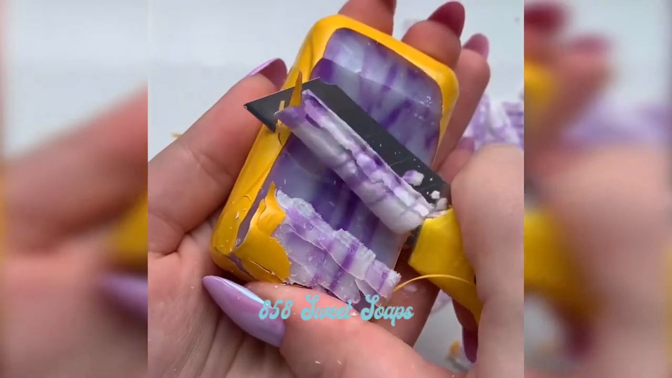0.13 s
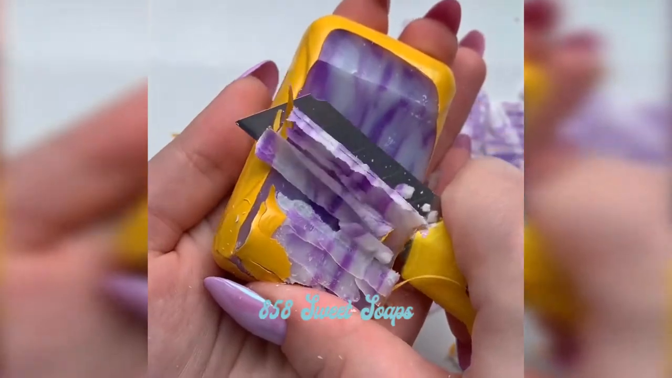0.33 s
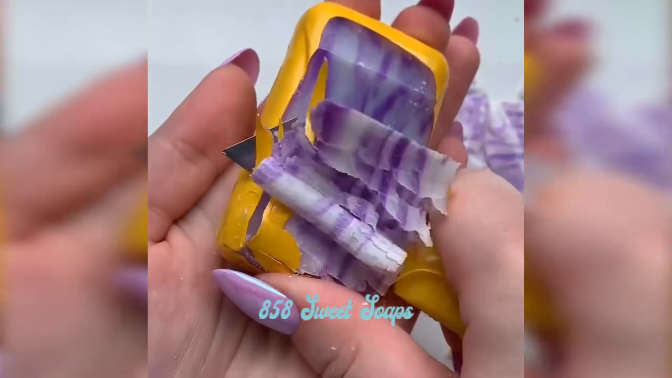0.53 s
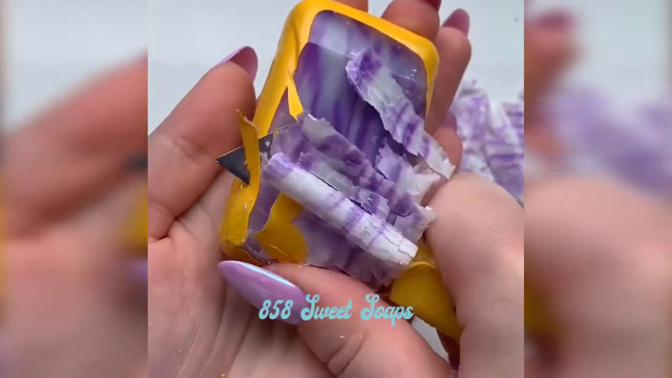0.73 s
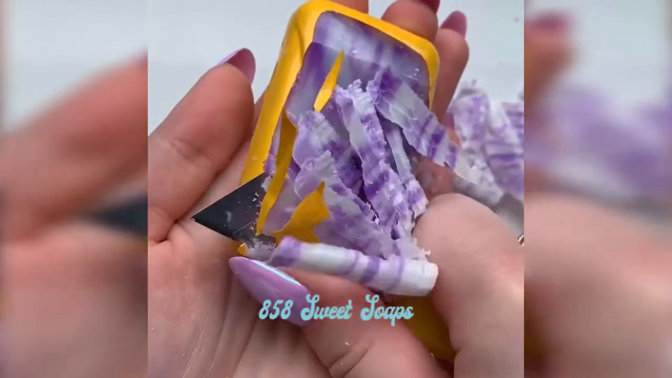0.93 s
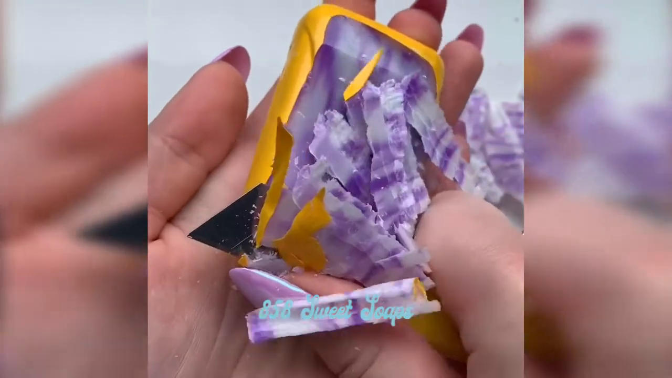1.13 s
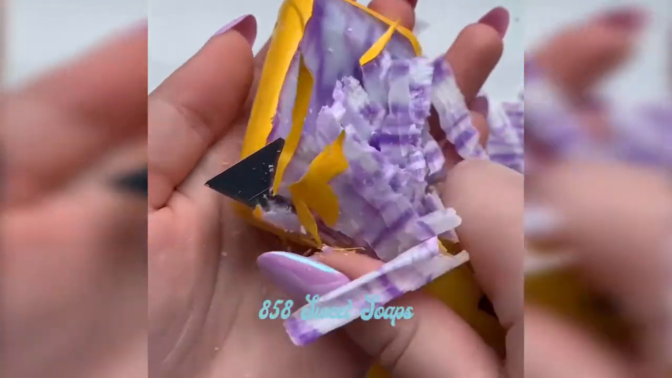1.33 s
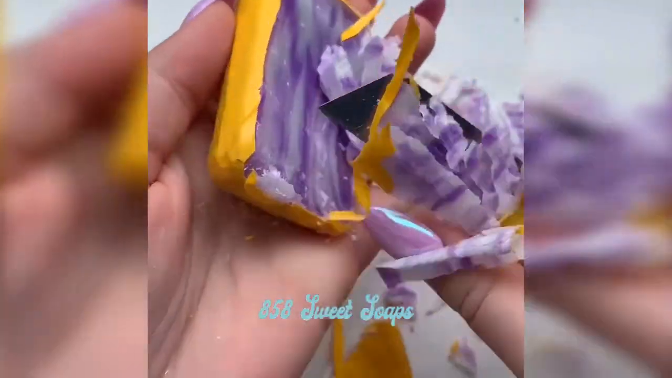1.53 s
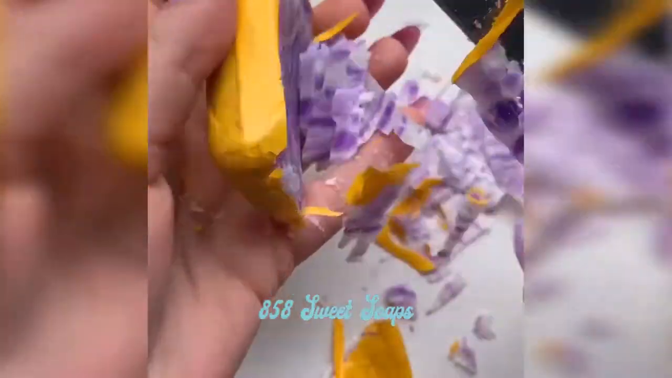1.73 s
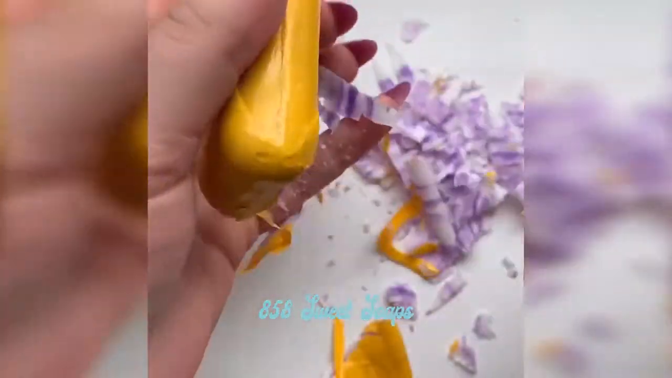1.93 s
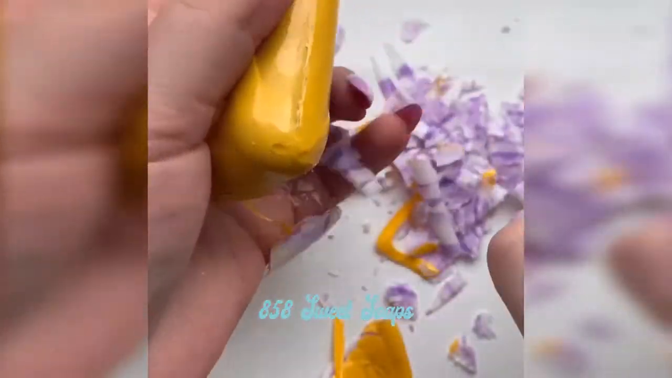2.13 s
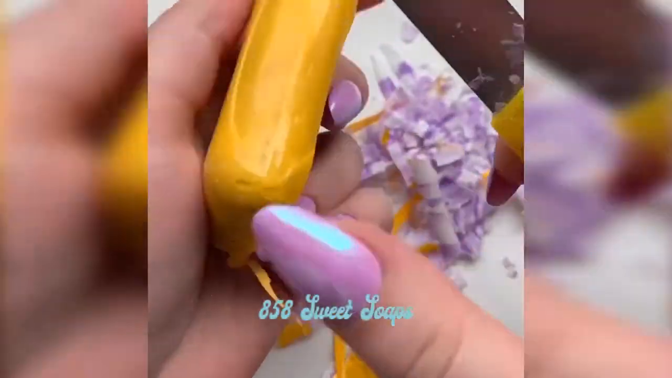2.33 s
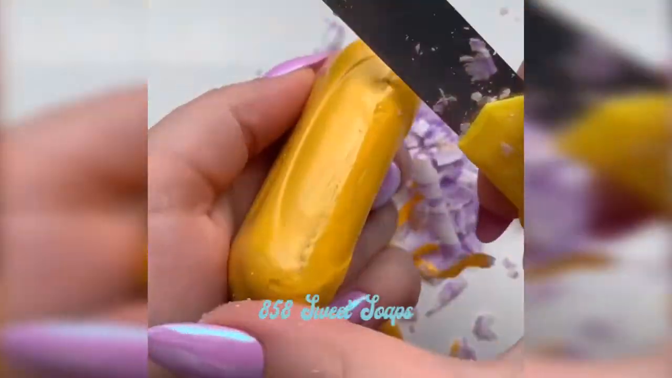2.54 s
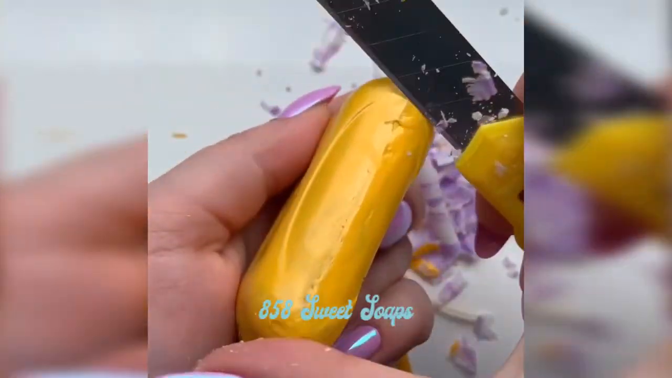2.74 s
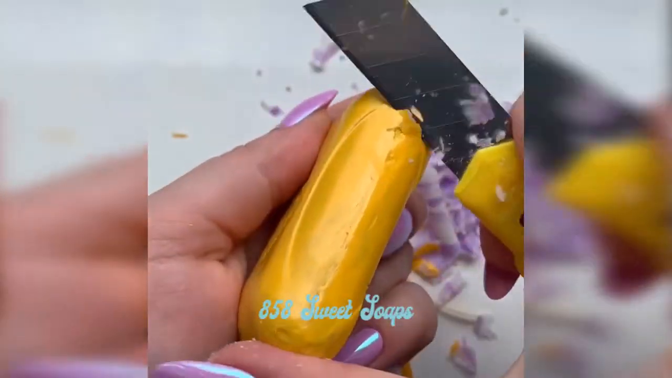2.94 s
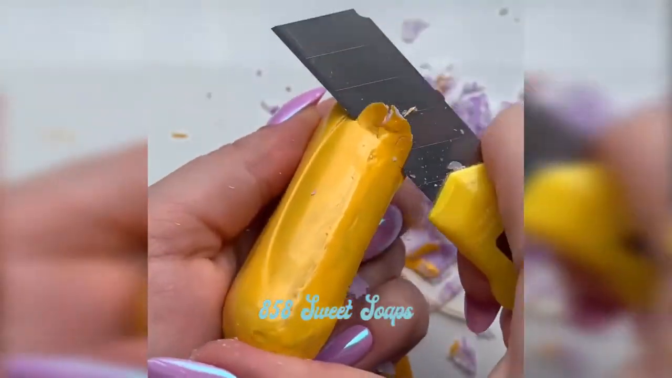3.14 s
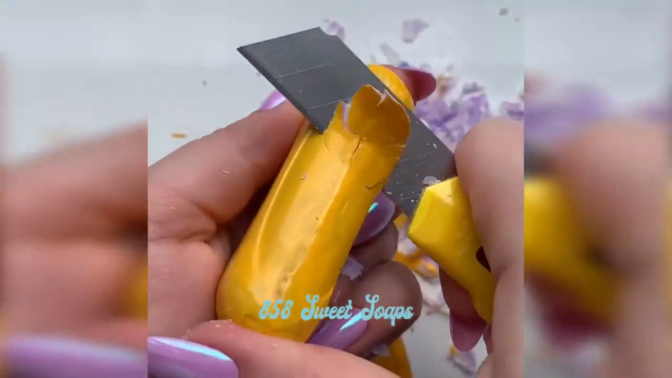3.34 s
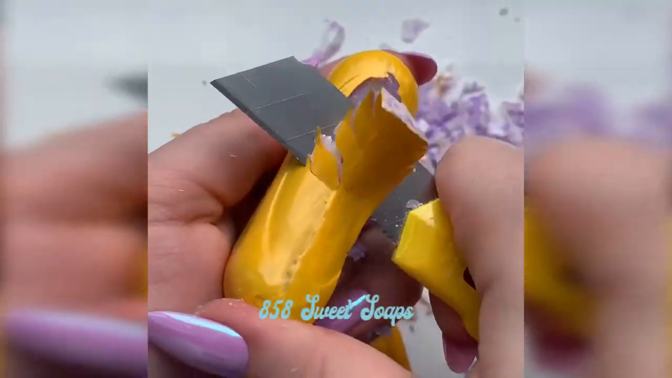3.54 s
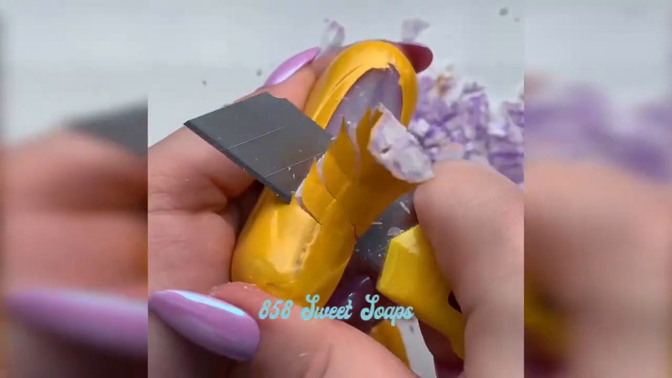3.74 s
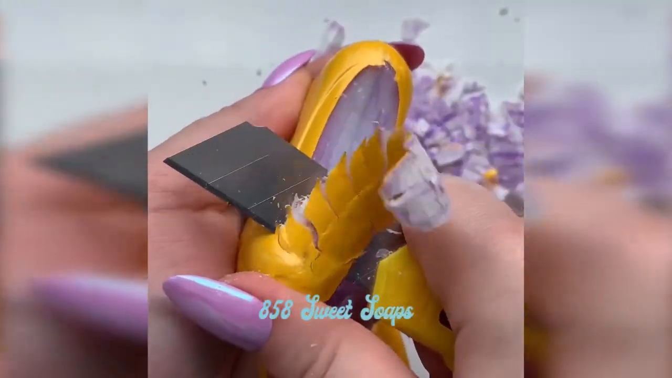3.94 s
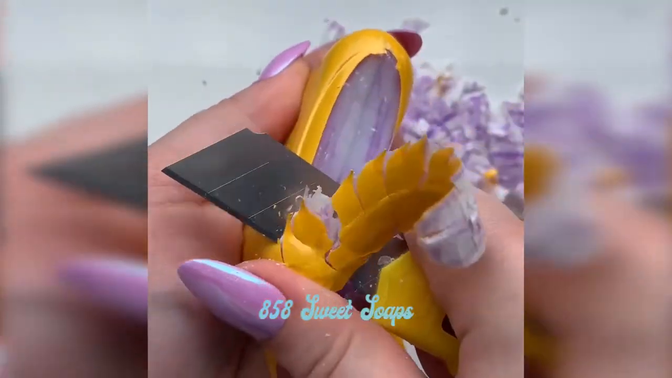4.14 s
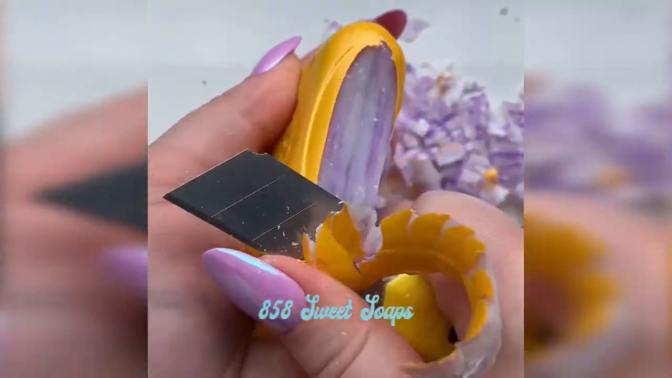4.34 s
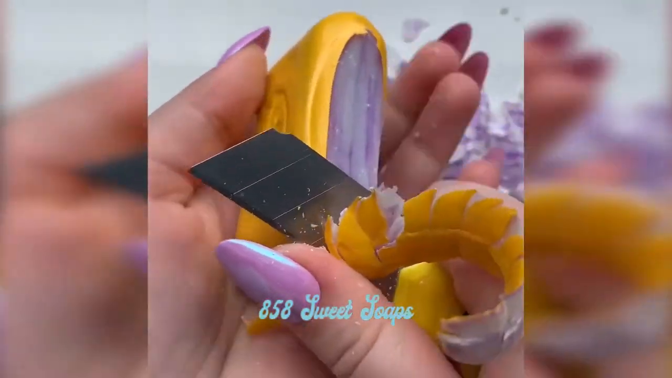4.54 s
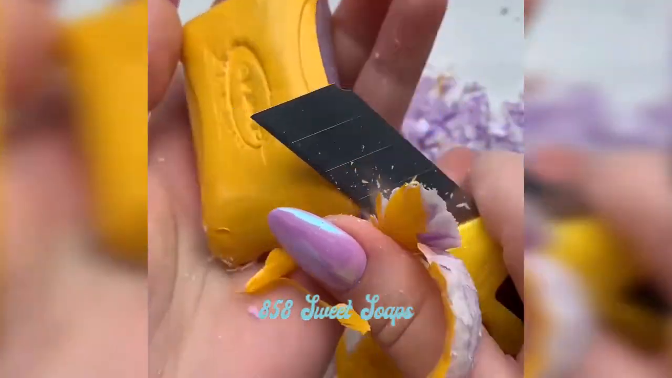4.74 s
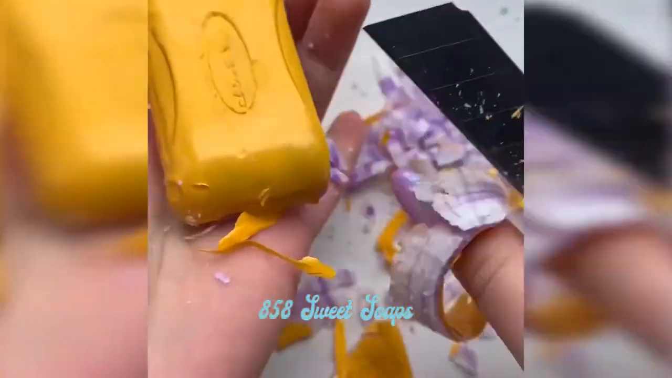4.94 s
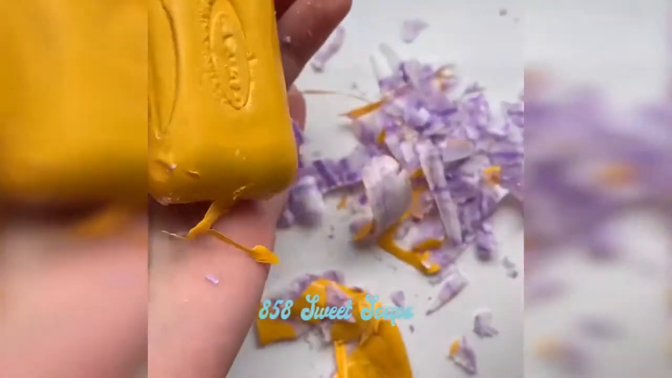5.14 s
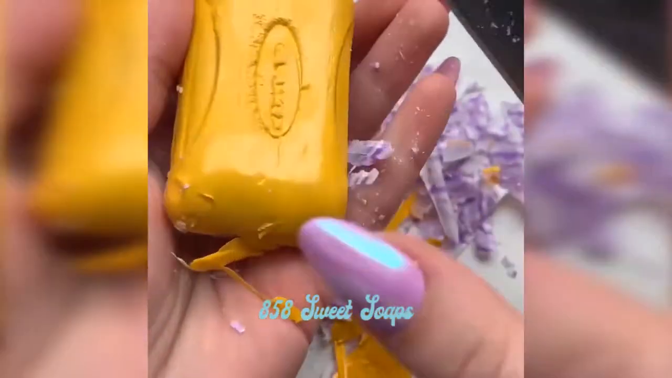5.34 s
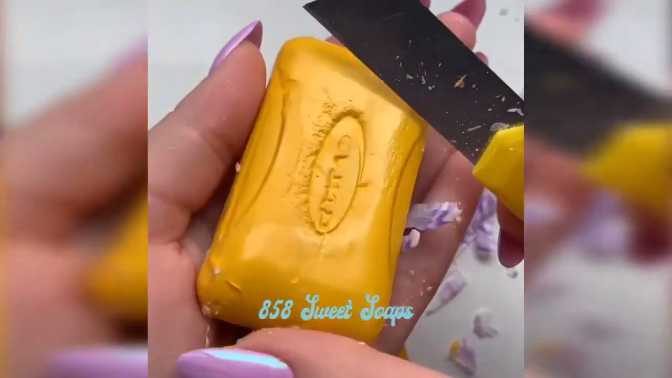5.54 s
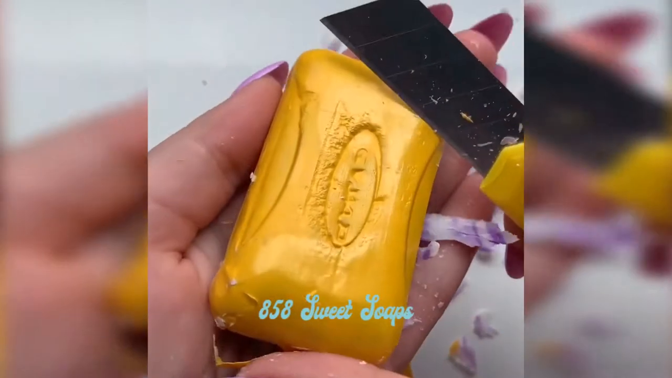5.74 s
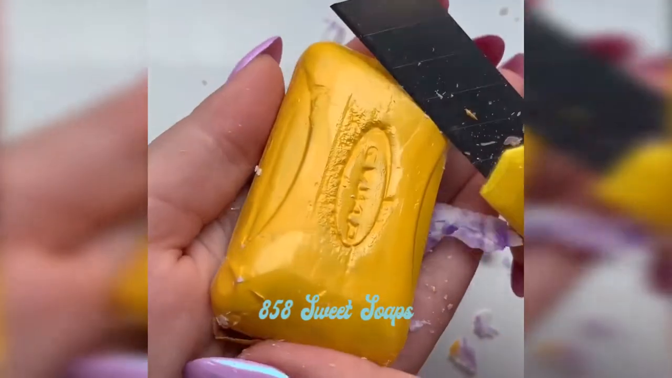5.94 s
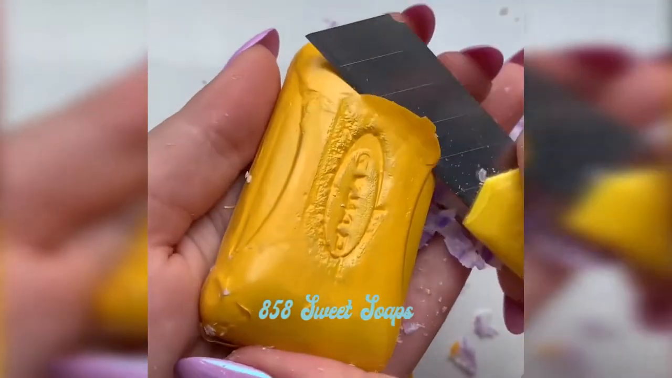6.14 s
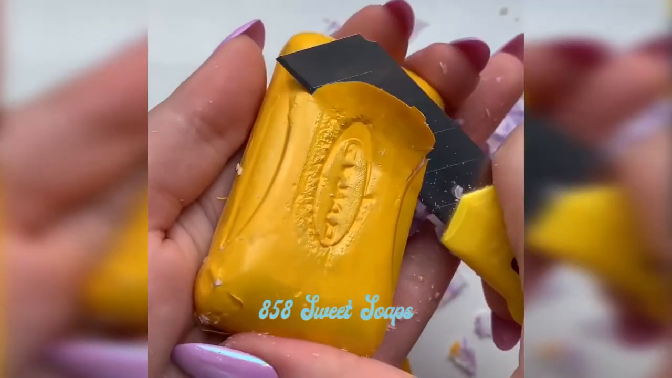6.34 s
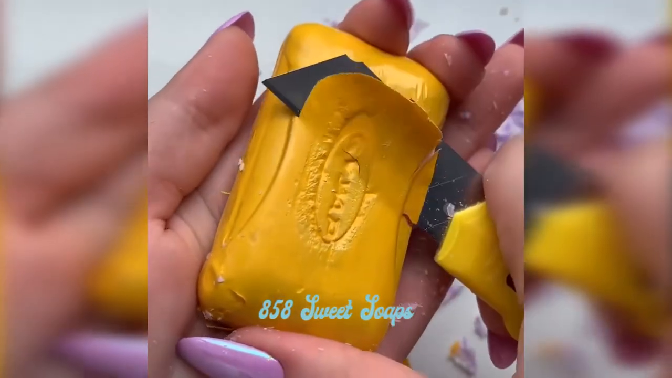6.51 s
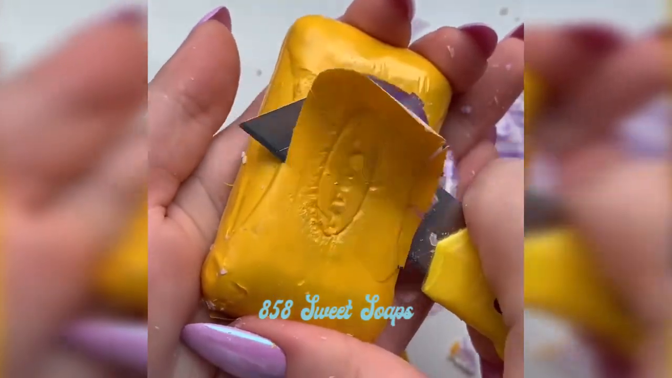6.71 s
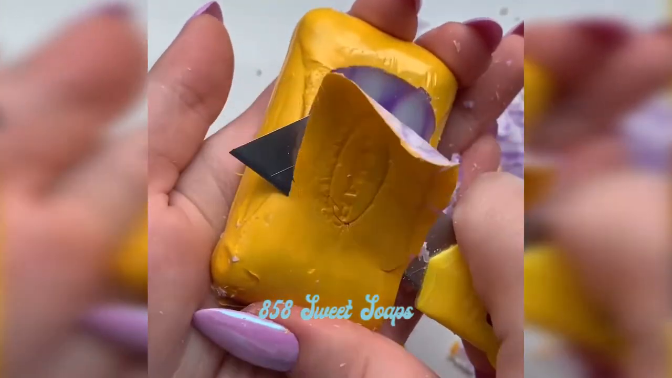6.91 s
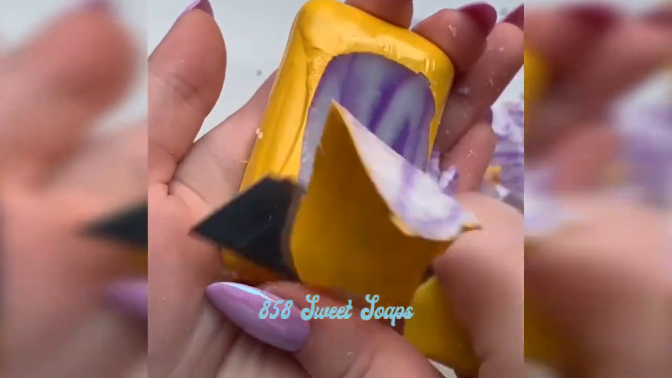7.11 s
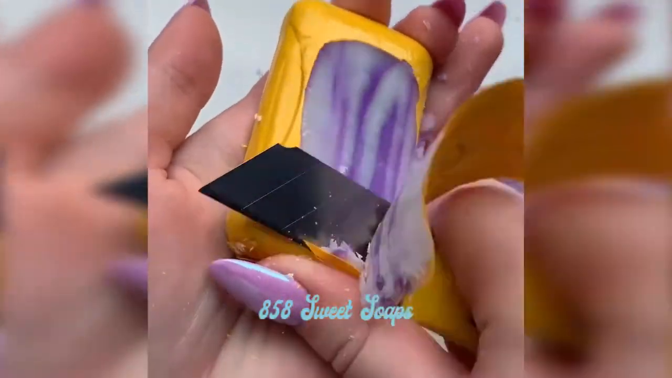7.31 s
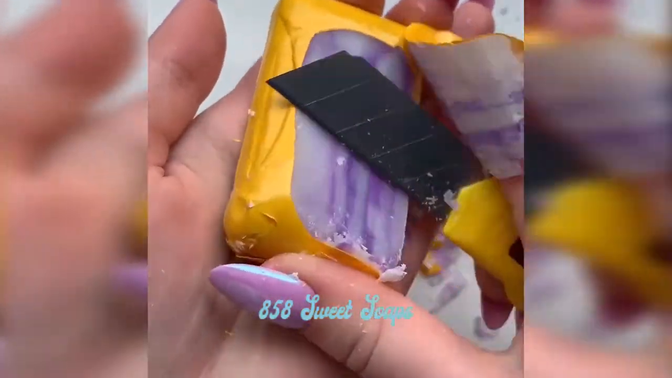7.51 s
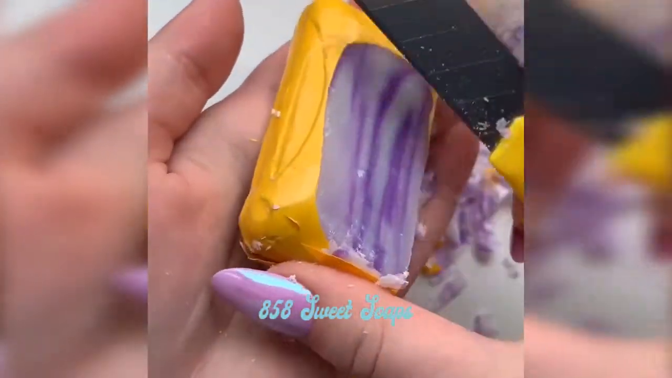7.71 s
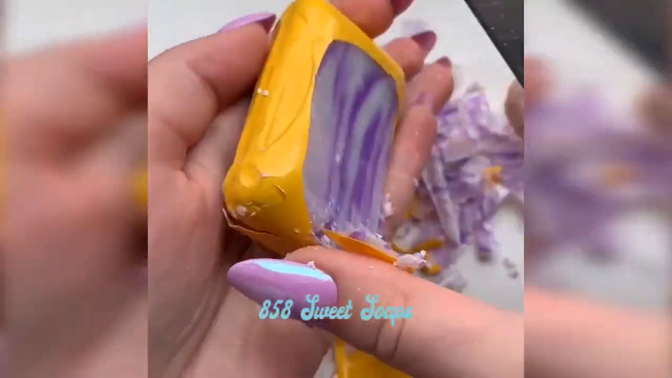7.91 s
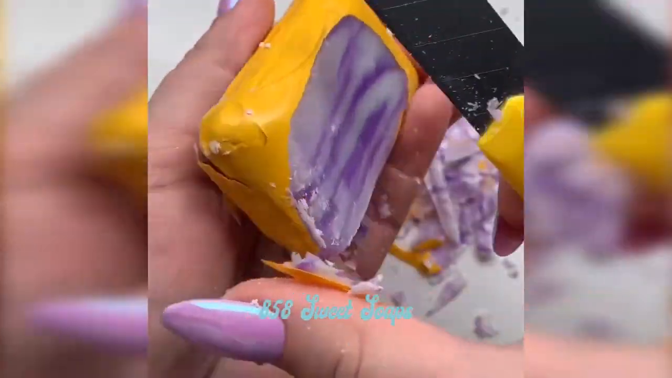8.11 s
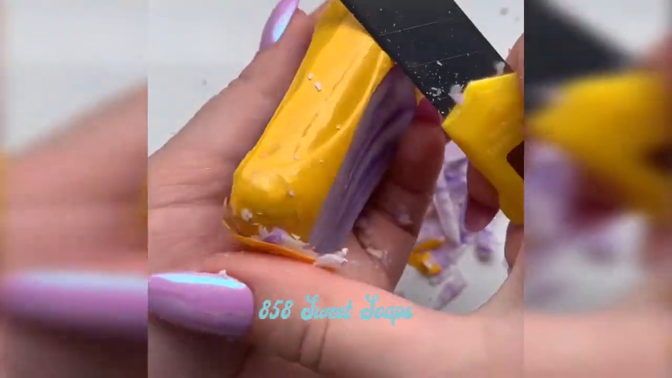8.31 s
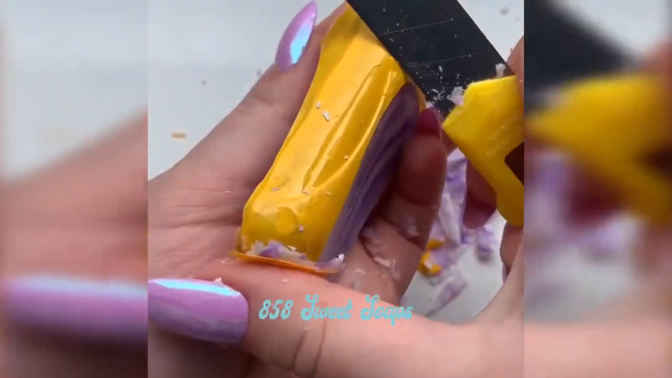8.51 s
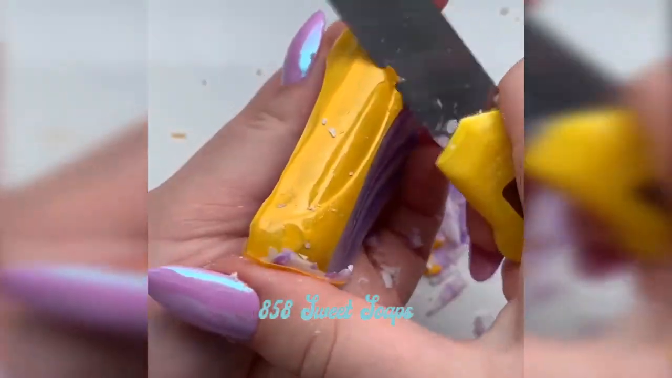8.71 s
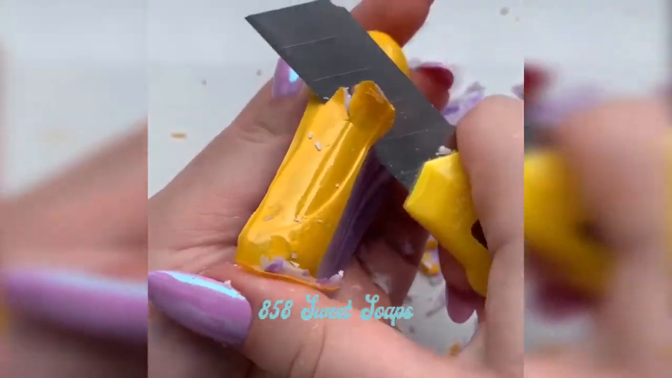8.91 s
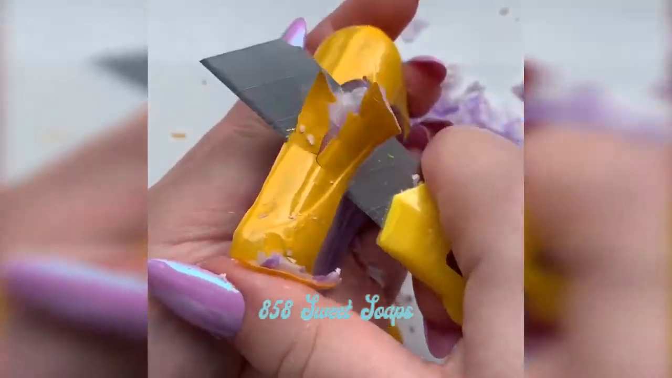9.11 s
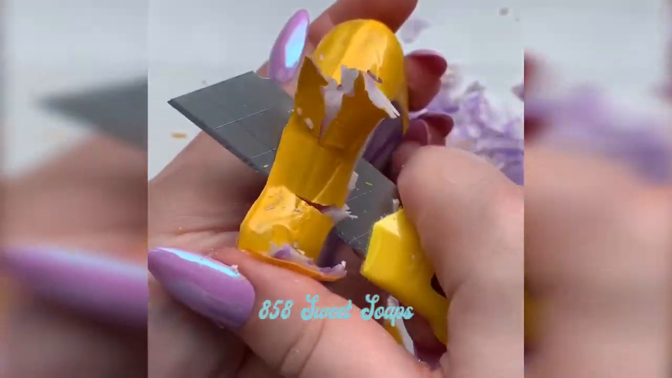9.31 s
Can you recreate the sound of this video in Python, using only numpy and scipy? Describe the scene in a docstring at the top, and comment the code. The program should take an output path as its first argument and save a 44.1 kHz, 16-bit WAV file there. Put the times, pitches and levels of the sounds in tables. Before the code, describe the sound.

Very close stereo microphone in a quiet room. A blade cuts a dry bar of soap held in the hand: light scrapes and brittle cracks first, with a fuller metallic ring, then shavings rustle and knock dully. Sharp snaps and crackling bursts follow, densest around seven seconds, then thin out to a few late cracks.

```python
"""A blade shaves a dry bar of soap held close to a two-port microphone in a quiet room.
From the start, scrapes and cracks alternate, the blade ringing fuller for the first second; then shavings rustle
and knock dully, sharp cracks come in bursts, and after the densest burst near 7 s they thin out, with a few at the end.
Each crack is a run of noisy micro-fractures that excites decaying modes of flakes, blade and bar; random grains
excite them in scrapes and rustles. Gliding thumps, short pitched rings, room echo, hiss and hum complete the sound."""
import sys
import numpy as np
from scipy import signal
from scipy.fft import rfft, irfft, next_fast_len
from scipy.io import wavfile
from scipy.ndimage import uniform_filter1d

SR = 44100
rng = np.random.default_rng(int(sys.argv[2]) if len(sys.argv) > 2 else 0)


def wrap_up_sound(samples):
    """Save the sound to the file named by the first command line argument, as 16-bit audio."""
    columns = np.atleast_2d(samples).T
    # keep every value between -1 and 1, then stretch to whole-number steps
    tamed = np.clip(columns, -1, 1)
    steps = np.round(tamed * 32767).astype(np.int16)
    wavfile.write(sys.argv[1], SR, steps)


N = 412776

# Cracks; levels are direct-sound energies re 1 ms at full scale, before the crumbling tail is added:
# start_s, flake_level_db, blade_level_db, nominal_length_ms
CRACKS = [(0.068, -47, -44, 6.6), (0.2036, -26.5, -35, 7.4), (0.472, -34, -63, 4), (0.49, -23, -30, 7.7),
          (0.538, -20.5, -27.5, 10.7), (.693, -45, -41.5, 1.5), (0.7019, -30, -32, 7.6),
          (0.7422, -30.5, -32, 2.1), (0.8205, -18.5, -25.5, 5.4), (0.8698, -25.5, -34.5, 1.8),
          (.96, -25.5, -27, 8.2), (0.972, -16.5, -22, 13), (1.0132, -33, -34, 2.8), (1.09, -44, -46.5, 1.7),
          (1.1768, -22, -35.5, 3.4), (1.233, -24.5, -40, 0.63), (1.3162, -22, -35.5, 1.6),
          (1.335, -32.5, -42.5, 1.6), (1.367, -17.5, -28.5, 4.2), (1.384, -10.5, -39.5, 0.88),
          (1.388, -10, -25.5, 2.7), (1.4079, -21.5, -27.5, 3.7), (1.638, -37.5, -36, 3.2),
          (1.667, -52, -37, 5.7), (1.792, -40.5, -34.5, 4.9), (1.8678, -31.5, -30.5, 3.5),
          (1.938, -26.5, -35.5, 17), (1.9627, -25, -38, 5.8), (2.0774, -23.5, -41, 1.9),
          (2.396, -39.5, -65.5, 2.4), (2.41, -50, -41, 2.7), (2.7812, -28, -18, 7.5),
          (2.865, -52.5, -37.5, 4.2), (2.877, -27.5, -20.5, 4.3), (3.0374, -4.5, -3, 4.1),
          (3.158, -35, -38, 24), (3.26, -28, -42.5, 24), (3.4021, -13.5, -69, 6.4),
          (3.417, -21, -27.5, 11.3), (3.458, -24.5, -34.5, 6.9), (3.503, -24.5, -58, 4),
          (3.5186, -25.5, -57, 4.2), (3.5294, -25.5, -33, 11), (3.5952, -19.5, -35, .86),
          (3.628, -26, -71, .82), (3.663, -17.5, -34, 7.3), (3.6745, -30, -26.5, 4.4),
          (3.702, -31.5, -59, 2.2), (3.754, -20, -39.5, .84), (3.771, -27.5, -29.5, 5.2),
          (3.788, -16, -55.5, .6), (3.838, -30, -54, 1.8), (3.86, -30, -70, 1.3), (3.8676, -17, -30.5, 8.7),
          (4.006, -16, -48, 4.2), (4.0186, -11, -40, 2.2), (4.03, -27, -58, 2.2), (4.062, -22.5, -61, .64),
          (4.2371, -26, -30.5, 8.5), (4.2565, -34.5, -48, 0.81), (4.303, -31, -41.5, 6.5),
          (4.32, -34, -49, 2.6), (4.5913, -59, -42.5, 1.2), (4.7445, -24.5, -44, 1.5),
          (4.754, -26, -30.5, 11), (4.803, -39, -103, 2), (4.841, -42, -82, .8), (4.855, -50, -38.5, 5.1),
          (4.8903, -44, -27.5, 8), (4.9824, -37, -36.5, 2.9), (5.0438, -26.5, -24.5, 9.6),
          (5.126, -24.5, -42.5, 16), (5.1711, -29, -27, 3.4), (5.6583, -12.5, -11, 6.6),
          (5.803, -43.5, -64, 1.5), (6.108, -2, -9.5, 3.6), (6.1978, -26.5, -31.5, 13),
          (6.282, -25.5, -78, 2.2), (6.3044, -15.5, -63.5, 1.7), (6.3137, -20, -37, 3.7),
          (6.3652, -23.5, -29.5, 7.6), (6.45, -35, -83, 0.75), (6.5015, -4.5, -24.5, 1.86),
          (6.5396, -5, -37.5, 2.6), (6.5673, -9.5, -26.5, 1.3), (6.579, -17.5, -41.5, 0.9),
          (6.6463, -24, -40, 6.4), (6.683, -38, -53, 4.8), (6.699, -38, -52, 2.3), (6.71, -32.5, -52, 4.7),
          (6.7904, -11.5, -22.5, 13.4), (6.807, -12, -29, .53), (6.8322, -16.5, -32, 6.7),
          (6.8837, -26, -36, 0.95), (6.937, -24, -57, 1.79), (6.9501, -18.5, -51.5, 4.2),
          (7.0707, -23, -47, 2.3), (7.1629, -12, -22, 9.8), (7.1755, -42, -25.5, 1.9),
          (7.1918, -15.5, -19, 2.4), (7.2147, -1, -11, 6), (7.2265, -9, -34, 0.69),
          (7.232, -4.5, -15, 0.88), (7.268, -23, -45, 4.8), (7.38, -19, -22.5, 14),
          (7.3922, -24.5, -20, 0.81), (7.4853, -30, -35.5, 51), (7.527, -30, -39, 19),
          (7.607, -39, -29, 4.2), (8.0115, -13, -14.5, 8.4), (8.408, -20.5, -13.5, 28),
          (8.6616, -46, -27.5, 5.5), (8.739, -23.5, -22, 8), (8.8156, -4, -4, 3.9), (8.841, -22, -64.5, 4),
          (8.912, -45, -39, 5.4), (8.9254, -23, -83, .75), (9.0546, -25.5, -66, 3.3),
          (9.0611, -13.5, -29.5, 1.95), (9.081, -32, -43, 2.5), (9.11, -32, -68, 1.5),
          (9.1349, -41, -27, .65), (9.1376, -13, -29.5, 2.8), (9.278, -17, -32, 13),
          (9.305, -13.5, -26, 1.1)]
# Dull knocks of shavings and bar in the hands; heavy pieces knock lower: start_s, bar_level_db, pitch_ratio
KNOCKS = [(0.9727, -36, 1.23), (1.695, -32.5, 1.48), (2.005, -35.5, 1.02), (2.088, -27, 0.93),
          (2.1408, -32, 0.92), (2.2377, -42, 0.96), (2.2854, -33, 0.95), (2.3221, -38, 1.4),
          (2.347, -43, 1.15), (2.3982, -37, 0.87), (2.4348, -46, 0.93), (5.1425, -26, 0.51),
          (5.161, -29.5, 0.5), (5.1724, -32, 0.89), (8.0134, -16, 1.2), (8.739, -29.5, 0.81)]
# The blade scrapes through crumbling soap: start_s, end_s, blade_level_db, fizz_above_blade_db
SCRAPES = [(0, 0.325, -64, 3.5), (0.416, 0.598, -61, -0.5), (0.626, 0.93, -63.5, 2),
           (0.939, 1.005, -49.5, 2), (1.162, 1.257, -59, 4), (1.33, 1.503, -62.5, 13),
           (2.853, 2.988, -58.5, -18), (3.384, 3.922, -62, -7), (3.994, 4.08, -55.5, -4),
           (4.226, 4.354, -55.5, 1.5), (4.531, 4.642, -64, -3), (4.74, 5.059, -65, -1.5),
           (6.12, 6.464, -59, 3), (6.493, 6.633, -60, 6), (6.637, 6.736, -61, 0), (6.783, 6.904, -59.5, -4),
           (6.931, 7.006, -56, 2), (7.157, 7.305, -63.5, -1), (7.452, 7.621, -50, -8),
           (7.722, 7.865, -64, -1), (8.412, 8.518, -55, -3.5), (8.81, 8.976, -65.5, 19)]
# Shavings rustle in the palm and slide off: start_s, end_s, blade_level_db, bar_level_db, fizz_above_blade_db
RUSTLES = [(1.6, 1.802, -54, -60.5, -4), (1.818, 2.053, -53.5, -57, -0.5), (2.057, 2.197, -52, -54, -0.5),
           (2.227, 2.285, -64, -52.5, -2), (2.276, 2.392, -55, -48.5, -5.5), (2.392, 2.482, -72, -55.5, 3),
           (5.108, 5.224, -51.5, -50, 0), (5.295, 5.355, -62.5, -58.5, -1.5), (7.999, 8.129, -55, -46.5, 0)]
# Short rings at one pitch, mostly the blade ringing on near 2.25 kHz after a crack: start_s, pitch_hz,
# level_db, t60_s
PINGS = [(1.388, 2223, -29, 0.041), (1.411, 2226, -35, 0.097), (2.786, 1130, -43, 0.12),
         (3.041, 2249, -15, 0.029), (6.111, 2330, -19.5, 0.033), (7.778, 2235, -52, .06),
         (7.827, 2250, -41, 0.023), (8.816, 2287, -13.5, .035), (9.061, 2250, -32.5, 0.057)]
# Thumps through the hands: start_s, level_db
JOLTS = [(0.204, -37.5), (0.489, -30), (0.967, -33), (3.038, -23.5), (3.528, -38.5), (3.672, -34),
         (3.769, -37), (3.865, -33.5), (4.238, -35.5), (6.104, -21), (6.797, -30.5), (7.205, -30),
         (7.482, -35), (8.808, -34), (9.13, -34)]
# Spectrum of the flake modes before tilt: frequency_hz, relative_level_db
FLAKE_SPECTRUM = [(4000, -9.5), (6500, -2.5), (8500, 2.5), (10500, 3), (13000, -0.5), (15500, -3.5),
                  (16500, -19)]
# Main modes of the blade, before detuning and the hollow: frequency_hz, relative_level_db, t60_s
BLADE_MODES = [(1716, -12.5, 0.029), (2250, 2, 0.0083), (2890, -0.5, 0.011), (3142, -1.5, 0.016),
               (3510, -6.5, 0.0076), (5530, -6, 0.012), (6270, -1.5, 0.042), (4200, -8, 0.024)]
# Main modes of the bar, before detuning: frequency_hz, relative_level_db, t60_s
BAR_MODES = [(189.6, -10, 0.13), (497.7, 0, 0.03), (746, 3, 0.026), (920, -3, 0.034), (1067, -1.5, 0.034)]
# Left port against right: frequency_hz, left_gain_db
PORT_GAIN = [(400, 0), (1200, 4.5), (2300, 2.4), (4000, -.4), (8000, 0)]
# Phase of the left port, on top of its delay: frequency_hz, left_lead_rad
PORT_LEAD = [(300, .3), (950, 1.3), (1500, 1.7), (1900, 2.6), (2330, 4.9), (2700, 6.4), (6000, 7.4),
             (7000, 2 * np.pi)]
# Reverberation time of the room: frequency_hz, t60_s
ROOM_DECAY = [(200, 0.072), (1000, 0.33), (3000, 0.33), (7500, 0.23), (14000, 0.22)]
# Spectral colour of the echo: frequency_hz, relative_level_db
ROOM_COLOUR = [(500, 7), (1600, -2), (3300, 5), (6000, 1.5), (12000, -4.5)]
# Spectral shape of the room tone: frequency_hz, relative_level_db (per Hz)
AIR_SPECTRUM = [(20, -28), (35, -0.5), (70, -1.5), (142, -8.5), (266, -8), (600, -23), (1360, -23.5),
                (3150, -25), (6500, -33.5), (12000, -32.5), (14000, -38.5), (16500, -63)]
# Likeness of the room tone at the two ports: frequency_hz, coherence (0 to 1)
AIR_COHERENCE = [(60, 0.89), (600, 1), (2000, 0.093), (9000, 0.21)]
# Wavering low hum: frequency_hz, resonance_width_hz, rms_level_db
HUM = (49, 14, -58)

BAR_PER_BLADE, BAR_BASE_DB = 1.18, -15.5  # a crack that rings the blade hard knocks the bar harder still
KNOCK_MS, KNOCK_FLAKE_DB, KNOCK_BLADE_DB = 1.2, -22, -9  # nominal length; levels relative to the bar
SCRAPE_BAR_DB = -12.5  # relative to the blade
SETTLE_DB = 5  # scrapes and rustles fade this much from start to end
# Thin flakes, which hardly ring the blade, snap brighter: dB per octave for each dB of contrast beyond EVEN_DB
BRIGHT_DB_PER_DB, EVEN_DB = 0.6784, 13
DULLEST_DB = 1  # even thick flakes keep some sparkle: least mean tilt, dB per octave
RISE = 0.22  # build-up of a fracture, as a share of its run
FIRST_SNAP = 5.2  # added impulse of the first fracture in a run
# Cutting inside the hollowed face lifts the first blade mode, the last a third as much, and lengthens both
HOLLOW_UNTIL_S, HOLLOW_DB, HOLLOW_RING_S = 1.12, 8.5, 0.024
THIN = signal.butter(2, 2200, "high", fs=SR, output="sos")  # small flakes radiate no bass
LAG_S = 11.4 / SR  # the left port is further from the soap
ROOM_DB, BLUR_HZ = -17.5, 454.3  # echo gain; rms rate at which the two echo tails turn
AIR_DB = -59.5  # rms
WHINE_HZ, WHINE_DB = 3180, -79.5  # faint steady tone, rms
EDGE_HZ = 16300  # upper band limit


def gain_of(db):
    """Amplitude ratio from the logarithmic level."""
    return 10 ** (np.asarray(db) / 20)


def evened(x):
    """Normalisation to unit root-mean-square."""
    return x / np.sqrt(np.mean(x ** 2) + 1e-20)


def read(points, hz):
    """Linear interpolation along a logarithmic frequency axis."""
    f, value = np.transpose(points)
    return np.interp(np.log(hz + 1), np.log(f + 1), value)


def add(mix, s, sound):
    """Superposition of a sound on the mix from time s."""
    part = mix[:, round(s * SR):][:, :sound.shape[1]]
    part += sound[:, :part.shape[1]]


def cracks(creak=0.013, crumbling=0.11, crumbling_ms=9.3):
    """Impulsive fracture: uneven micro-fractures build up, snap and excite the bodies; other flakes crumble on."""
    out = np.zeros((2, N))
    t_ms = np.arange(-440, 2000) / SR * 1000
    before, after = np.minimum(t_ms, 0), np.maximum(t_ms, 0)
    events = blows()
    draws = rng.standard_normal((len(events), 44, 4))
    grit = rng.standard_normal((len(events), len(t_ms), 4))
    rings = []
    for draw, (s, flake, blade, bar, ms, pitch) in zip(draws, events):
        tilt_db = max(BRIGHT_DB_PER_DB * (flake - blade - EVEN_DB), DULLEST_DB)
        rings.append(bodies(draw, tilt_db, HOLLOW_DB * (s < HOLLOW_UNTIL_S), pitch))

    for k, (s, *levels_db, ms, _) in enumerate(events):
        *noise, lumps = grit[k].T
        run = max(ms - .9, .1)  # the ringing itself fills the shortest cracks
        slow_creak = creak * run * np.exp(before / 3.7) * (t_ms < 0)
        fade_in = (1 - t_ms / t_ms[0]).clip(0, 1)
        rise = (np.exp(before / (RISE * run)) + slow_creak) * fade_in
        snap = rise * np.exp(-(after / run) ** 1.1) * gain_of(3.4 * lumps)
        first = FIRST_SNAP * (t_ms == 0)
        tail = crumbling * run ** 0.4 * np.exp(-after / crumbling_ms) * (t_ms > 0) * gain_of(6.4 * lumps)
        # the crumbling rings with the mode sets of two other blows
        others = map(np.add, rings[k - 1], rings[k - 2])
        for db, body, other, jitter in zip(levels_db, rings[k], others, noise):
            sound = signal.fftconvolve((snap * jitter + first)[None], body, axes=1)
            energy = (sound ** 2).sum() / 2 / SR * 1000  # mean of the ports, re 1 ms
            level = gain_of(db) / np.sqrt(energy)
            sound += signal.fftconvolve((tail * jitter)[None], other * np.sqrt(.5), axes=1)
            add(out, s + t_ms[0] / 1000, level * sound)
    return out


def blows():
    """Shared excitation: cracks and knocks as start_s, flake_db, blade_db, bar_db, nominal_ms, bar pitch_ratio."""
    return ([(s, flake, blade, BAR_BASE_DB + BAR_PER_BLADE * blade, ms, 1) for s, flake, blade, ms in CRACKS]
            + [(s, db + KNOCK_FLAKE_DB, db + KNOCK_BLADE_DB, db, KNOCK_MS, pitch) for s, db, pitch in KNOCKS])


def bodies(draw, tilt_db=0, hollow_db=0, pitch=1):
    """Linear modal response: impulse responses of flakes, blade and bar."""
    blade = np.array(BLADE_MODES)
    blade[[0, -1], 1] += hollow_db, hollow_db / 3
    blade[[0, -1], 2] += HOLLOW_RING_S * (hollow_db > 0)
    bar = np.array(BAR_MODES) * [pitch, 1, 1]
    blade = detuned(blade, draw, dense_from_hz=2400, dense_to_hz=6200, dense_db=-1.5)
    bar = detuned(bar, draw[::-1], dense_from_hz=420 * pitch, dense_to_hz=1900 * pitch, dense_db=-3.0)
    flakes = signal.sosfilt(THIN, ring(flake_modes(draw, tilt_db), size=200))
    return flakes, ring(blade, size=800), ring(bar, size=1300)


def flake_modes(draw, tilt_db):
    """High modal density: each flake has many quickly dying modes, with a bright or dull tilt."""
    hz = np.geomspace(4300, 16400, len(draw)) * (1 + .01 * draw[:, 0])
    tilt = (tilt_db + 1.2 * draw[0, 2]) * np.log2(hz / 9000)
    bumps = np.sin(np.cumsum(abs(draw[:, 1])))
    level_db = read(FLAKE_SPECTRUM, hz) + tilt + 2.2 * bumps
    t60, phase, sway = .003 + 0 * hz, np.pi * draw[:, 2], (5000 / hz) ** 2 * draw[:, 3]
    return np.c_[hz, level_db, t60, phase, sway]


def detuned(modes, draw, dense_from_hz, dense_to_hz, dense_db, dense_t60=.006):
    """Modal perturbation: grip and depth of cut shift the main modes; many dry modes fill the gaps."""
    hz, db, t60 = np.transpose(modes)
    d, fill = draw[:len(hz)], draw[-18:]
    main = np.c_[hz * (1 + .02 * d[:, 0]), db + 2.5 * d[:, 1], t60, np.pi * d[:, 2], .5 * d[:, 3]]
    between = np.geomspace(dense_from_hz, dense_to_hz, len(fill)) * (1 + .03 * fill[:, 2])
    dry_t60 = dense_t60 * np.sqrt(2500 / between)  # higher modes die sooner
    dense = np.c_[between, dense_db + 3.0 * fill[:, 0], dry_t60, np.pi * fill[:, 3], .9 * fill[:, 1]]
    return np.r_[main, dense]


def ring(modes, size):
    """Modal superposition: decaying sinusoids reach the two ports a little out of phase."""
    hz, db, t60, phase, sway = np.transpose(modes)[:, :, None].astype(np.float32)
    t = np.arange(size, dtype=np.float32) / SR
    level = gain_of(db - 60 * t / np.maximum(t60, .001)) * (1 - np.exp(-2 * t * hz))
    angle = 2 * np.pi * hz * t + phase
    return np.array([(level * np.sin(angle + side * sway)).sum(0) for side in (.5, -.5)])


def crumbs(per_s=3500, uneven_db=2.0, clumps_db=5.0, count=3):
    """Random impulse process: many small grains of varied size break and drop in clumps."""
    size = gain_of(uneven_db * np.minimum(rng.exponential(1, N), 5)) * (rng.random(N) < per_s / SR)
    sign = rng.choice([-1., 1.], N)
    clumps = evened(uniform_filter1d(rng.standard_normal(N), 500))
    size *= sign * gain_of(clumps_db * clumps)
    kind, draws = rng.integers(0, count, N), rng.standard_normal((count, 44, 4))
    layers, levels = np.zeros((3, 2, N)), np.zeros((3, N))  # flakes, blade, bar
    for k, draw in enumerate(draws):
        grains = (size * (kind == k))[None]
        for layer, body in zip(layers, bodies(draw)):
            layer += signal.oaconvolve(grains, body, axes=1)[:, :N]
    for start, end, *db in spells():
        swell = signal.windows.tukey(round((end - start) * SR), .3)
        settle = gain_of(SETTLE_DB * np.linspace(.5, -.5, len(swell)))
        add(levels, max(start, 0), gain_of(db)[:, None] * swell * settle)
    return sum(level * evened(layer) for level, layer in zip(levels, layers))


def spells():
    """Sustained excitation: scrapes and rustles as start_s, end_s, fizz_db, blade_db, bar_db."""
    return ([(a, b, db + fizz, db, db + SCRAPE_BAR_DB) for a, b, db, fizz in SCRAPES]
            + [(a, b, db + fizz, db, bar) for a, b, db, bar, fizz in RUSTLES])


def pings():
    """Free decay of one mode, set off by a push and phase-shaken unevenly as it dies."""
    out, t = np.zeros((2, N)), np.arange(6000) / SR
    shakes = evened(uniform_filter1d(rng.standard_normal((len(PINGS), len(t))), size=90))
    for (s, hz, db, t60), shake in zip(PINGS, shakes):
        mode = np.sin(2 * np.pi * hz * t + 1.2 * shake) * gain_of(db - 60 * t / t60)
        attack = 1 - np.exp(-t / 0.00043)
        add(out, s, (mode * attack)[None])
    return out


def jolts(start_hz=230, end_hz=55, glide_s=.012, t60=.12, rumble=.45):
    """Damped oscillation with falling frequency: a quick push settles into a low, uneven wobble."""
    out, t = np.zeros((2, N)), np.arange(8000) / SR
    hz = end_hz + (start_hz - end_hz) * np.exp(-t / glide_s)
    glide = np.sin(2 * np.pi * np.cumsum(hz) / SR)
    low = signal.butter(2, [50, 330], "band", fs=SR, output="sos")
    shakes = evened(signal.sosfilt(low, rng.standard_normal((len(JOLTS), 2, len(t)))))
    for (s, db), (shared, own) in zip(JOLTS, shakes):
        push = glide + rumble * (shared + 0.37 * np.array([own, -own]))
        add(out, s, push * gain_of(db - 60 * t / t60) * (1 - np.exp(-t / 0.015)))
    return out


def ports(x):
    """Path difference: the left port hears the soap later, and the hand colours its middle range."""
    size = next_fast_len(N + 4096)
    hz = np.fft.rfftfreq(size, 1 / SR)
    phase = read(PORT_LEAD, hz) - 2 * np.pi * hz * LAG_S
    left = gain_of(read(PORT_GAIN, hz)) * np.exp(1j * phase)
    return np.array([irfft(rfft(x[0], size) * left, size)[:N], x[1]])


def room(x, size=12000):
    """Reverberation: sparse echoes decay by band; two tails in uneven alternation blur each ring into a wash."""
    wander = evened(uniform_filter1d(rng.standard_normal(N), size=40))
    turn = 2 * np.pi * BLUR_HZ * np.cumsum(wander) / SR
    out = 0
    for share in (np.sin(turn), np.cos(turn)):
        taps = np.zeros((3, size))
        at = np.arange(140, size - 20, 20) + rng.integers(0, 20, (3, (size - 141) // 20))
        np.put_along_axis(taps, at, rng.choice([-1., 1.], at.shape), 1)
        # two rows are each port's own, the third is shared
        hz, t, z = signal.stft(taps[:2] * .28 + taps[2], SR, nperseg=256)
        decay_db = read(ROOM_COLOUR, hz)[:, None] - 60 * t / read(ROOM_DECAY, hz)[:, None]
        tail = signal.istft(z * gain_of(decay_db), SR, nperseg=256)[1]
        out = out + signal.oaconvolve(x * share, tail / np.linalg.norm(tail[0]), axes=1)[:, :N]
    return out


def air():
    """Partially coherent noise field: low rumble and faint hiss, slightly patchy."""
    frames, hz = N // 512 + 5, np.fft.rfftfreq(2048, 1 / SR)
    a, b, c, d, patches = rng.standard_normal((frames, 1025, 5)).T
    patches = evened(uniform_filter1d(uniform_filter1d(patches, 24, 0), 6, 1))
    same = np.clip(read(AIR_COHERENCE, hz), -1, 1)[:, None]
    right = a + 1j * b
    late = np.exp(-2j * np.pi * hz * LAG_S)[:, None]
    left = late * (same * right + np.sqrt(1 - same ** 2) * (c + 1j * d))
    z = np.array([left, right]) * gain_of(read(AIR_SPECTRUM, hz)[:, None] + 0.64 * patches)
    return gain_of(AIR_DB) * evened(signal.istft(z, nperseg=2048, noverlap=1536)[1][:, :N])


def hum():
    """Narrow-band modulation: a wavering low hum, alike at both ports, and a thin steady whine."""
    hz, width, db = HUM
    t, r = np.arange(N) / SR, np.exp(-np.pi * width / SR)
    a, b = rng.standard_normal((N, 2)).T
    smooth = signal.lfilter([1], [1, -r], a + 1j * b)
    waver = signal.lfilter([1], [1, -r], smooth)
    low = evened(((1.4 + waver / abs(waver).mean()) * np.exp(2j * np.pi * hz * t)).real)
    whine = np.sqrt(2) * gain_of(WHINE_DB) * np.sin(2 * np.pi * WHINE_HZ * t)
    return gain_of(db) * low + whine


def scene():
    """Superposition: soap and its echo reach the ports, over room tone and hum."""
    soap = cracks() + jolts() + crumbs() + pings()
    return ports(soap + gain_of(ROOM_DB) * room(soap)) + air() + hum()


def record(dry):
    """Amplitude and band limitation: peaks are held at full scale, then a low-pass follows."""
    held = np.clip(dry, -1, 1)
    low_pass = signal.firwin(511, EDGE_HZ, window=("kaiser", 9), fs=SR)
    return signal.oaconvolve(held, low_pass[None], "same")


dry = scene()
out = record(dry)
wrap_up_sound(out)
```